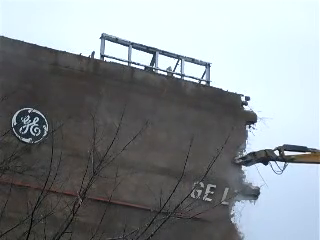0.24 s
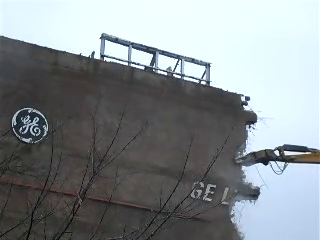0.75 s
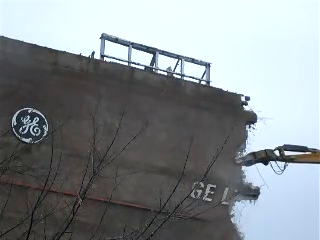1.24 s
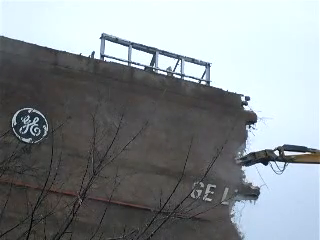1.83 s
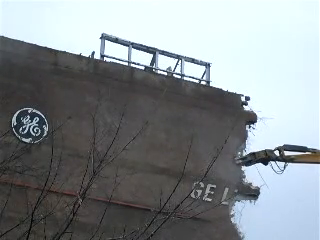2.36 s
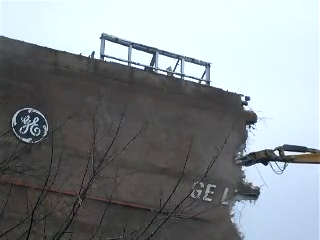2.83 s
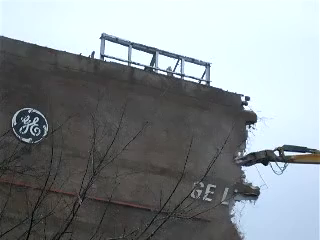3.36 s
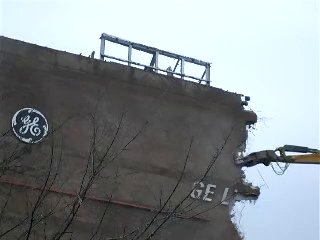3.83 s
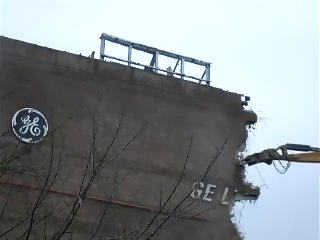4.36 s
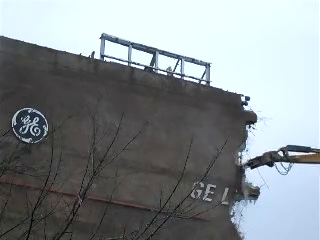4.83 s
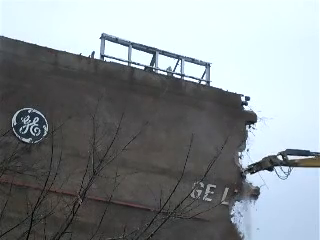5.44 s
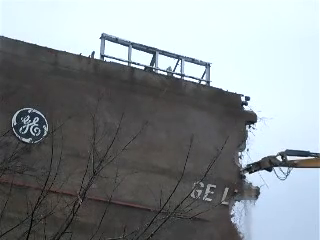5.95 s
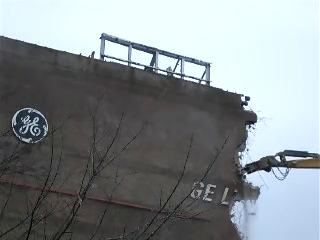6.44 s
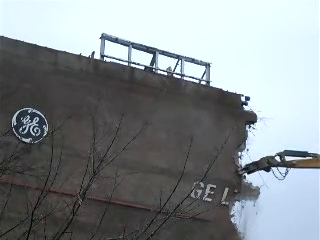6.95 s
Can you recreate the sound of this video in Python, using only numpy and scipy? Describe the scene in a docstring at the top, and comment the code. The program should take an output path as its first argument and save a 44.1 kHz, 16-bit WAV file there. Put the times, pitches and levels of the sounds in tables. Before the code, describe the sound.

Outdoors, a demolition excavator drones steadily, its fan and hydraulics roaring as it bites into a concrete wall. Chips shatter in short, sharp bursts over trickling grit, and a few heavy lumps thud down. About halfway through, a louder thud lands and the roar sinks, leaving the engine rumble. Near the end gravel slides, and chips and lumps fall thickly with a slight, hollow echo.

```python
"""A high-reach excavator bites into a concrete wall outdoors. From the start its diesel drones, fan and
hydraulics roar, hums and rushes swell in the din, and grit trickles. Chips shatter in short splashes, each
doubled by the hard ground. At 1.6 s the first heavy lump thuds down. Near 3 s the concrete gives, the
jaws ease off and the roar sinks. Around 6 s gravel slides, and chips and lumps fall thickly to the end."""
import sys
import numpy as np
from scipy import signal
from scipy.fft import rfft, irfft
from scipy.io import wavfile
from scipy.ndimage import uniform_filter1d

SR = 44100
rng = np.random.default_rng(int(sys.argv[2]) if len(sys.argv) > 2 else 0)


def generate_wav(sig):
    """Save sig (samples, or channels by samples) to the path in sys.argv[1] as 16-bit PCM at SR."""
    pcm = np.round(np.clip(np.atleast_2d(sig).T, -1, 1) * 32767).astype(np.int16)
    wavfile.write(sys.argv[1], SR, pcm)


N = 317520
TIME = np.arange(N) / SR

# Chips that shatter. Each row: start in seconds, base level in dB, heft in dB (more heft means
# louder big fragments), base time the splinters take to scatter in seconds.
CHIPS = [(0.05, -18.5, -6.5, 0.0064), (.206, -17.5, -4, .004), (0.291, -18.5, -12.5, 0.0059),
         (.409, -27, 2, .008), (.602, -25.5, -0.5, .003), (0.699, -18, -2.5, 0.0027),
         (.742, -19, -12, 0.002), (.973, -24, 1.5, .005), (1.131, -14.5, -4.5, 0.0031),
         (1.409, -22, 4, 0.0036), (1.432, -16, -2, 0.0033), (1.548, -21.5, -3.5, 0.0043),
         (1.62, -23, 2.5, 0.0055), (1.713, -23, 3, 0.006), (1.872, -21.5, 0.5, 0.0054),
         (1.944, -25.5, 2, .005), (2.525, -20.5, -10.5, 0.0034), (2.825, -27.5, -4, 0.0063),
         (2.979, -26, -1.5, .009), (3.131, -24.5, 4, 0.0032), (3.138, -13, -4.5, .001),
         (3.679, -25, -11, .0025), (3.828, -20, -4, .0045), (3.894, -19.5, 2, 0.0045),
         (4.093, -17, -2, 0.0057), (4.519, -19.5, 2, .0035), (4.575, -17, -1.5, .004),
         (4.624, -24.5, 1, 0.0042), (5.003, -18.5, -9.5, 0.004), (5.097, -18.5, 0, 0.0053),
         (5.29, -28.5, 5, 0.005), (5.318, -25.5, 1.5, 0.0087), (5.434, -24, 3, 0.0051),
         (5.489, -17, -5, .005), (5.51, -21.5, -3, 0.0042), (5.533, -14.5, -27.5, 0.0018),
         (5.727, -16, -4, 0.0032), (5.884, -20, -7.5, 0.0044), (6.023, -20.5, -2, 0.0062),
         (6.048, -24, -6, .004), (6.073, -26.5, 2, 0.0073), (6.097, -23.5, -1, .009),
         (6.132, -20.5, -1, .003), (6.242, -23.5, 1, 0.0027), (6.288, -22, -6, .003),
         (6.536, -17.5, -7.5, 0.0043), (6.614, -19.5, 2, .004), (6.719, -17.5, -4.5, .006),
         (6.765, -22, 5, .005), (6.888, -18.5, -5, .004), (6.92, -22.5, -8.5, 0.0071),
         (6.963, -22.5, 0.5, 0.0019), (6.99, -16.5, -13, 0.00086), (7.035, -24.5, 3, 0.0033),
         (7.106, -24, -1, 0.0054), (7.143, -20, -10, 0.0034)]
# The hollow tone of knocking stones. Each row: frequency in Hz, relative level in dB.
KNOCK_COLOUR = [(120, -33), (300, 3), (420, -2.5), (530, 7.5), (680, 3), (850, 0), (1050, -1),
                (1600, -23.5)]


def undb(db):
    """Turn decibels into a number to multiply a sound by."""
    return 10 ** (np.asarray(db) / 20)


def unit(x):
    """Scale a signal so that its average size (rms) is 1."""
    return x / np.sqrt(np.mean(x ** 2))


def curve(table):
    """Join rows of (seconds, value) with straight lines, one value per sample."""
    return np.interp(TIME, *np.transpose(table))


def walk(rate):
    """Smooth random wandering of size about 1, with rate new turns a second."""
    steps = np.interp(TIME * rate, np.arange(2048), rng.standard_normal(2048))
    return unit(uniform_filter1d(steps, int(SR / rate / 2)))


def swell(peak_s, length_s):
    """A smooth rise and fall, loudest at peak_s."""
    return np.cos(np.pi * np.clip((TIME - peak_s) / length_s, -.5, .5))


def colour(x, points):
    """Shape the tone along (Hz, dB) points; white noise keeps its power."""
    hz, db = np.transpose(points)
    octave = np.log2(np.maximum(np.arange(N // 2 + 1) * SR / N, 1))
    octaves_outside = np.maximum(np.log2(hz[0]) - octave, 0) + np.maximum(octave - np.log2(hz[-1]), 0)
    gain = undb(np.interp(octave, np.log2(hz), db) - 20 * octaves_outside)
    # These steps make the filter ring after each hit, not before it.
    cepstrum = irfft(np.log(unit(gain)), N)
    cepstrum[1:N // 2] *= 2
    cepstrum[N // 2 + 1:] = 0
    return irfft(rfft(x) * np.exp(rfft(cepstrum)), N)


def resonate(x, hz, width_hz):
    """Let a sound ring at one pitch; a smaller width rings longer."""
    return signal.lfilter(*signal.iirpeak(hz, hz / width_hz, fs=SR), x)


def narrow_noise(hz, width_hz):
    """Noise gathered around one pitch, which may move."""
    lowpass = signal.butter(2, width_hz / 2, fs=SR, output="sos")
    swirl = signal.sosfilt(lowpass, rng.standard_normal((2, N)))
    phase = 2 * np.pi * np.cumsum(hz * np.ones(N)) / SR
    return unit(swirl[0] * np.cos(phase) + swirl[1] * np.sin(phase))


def splinters(rate, scatter_db):
    """Tiny hits of uneven size at random moments, about rate of them a second."""
    hit = rng.random(N) < rate / SR
    size = undb(scatter_db * np.clip(rng.standard_normal(N), -2, 2))
    return unit(hit * size * rng.choice([-1, 1], N))


def splash(starts, db, spread_s):
    """The loudness of bursts of splinters: each grows for spread_s, then dies away."""
    power = np.zeros(N)
    for start, gain, spread in zip(starts, undb(db), spread_s):
        first = max(int(start * SR), 0)
        age = np.arange(min(SR // 5, N - first)) / SR / max(spread, .001)
        power[first:first + len(age)] += gain ** 2 * age * np.exp(1 - age)
    return np.sqrt(power)


def engine():
    """The diesel holds its speed: its firing tones waver on their way through the air, over a rumble."""
    # Firing tones. Each row: pitch in Hz, level in dB, amount of wavering in dB.
    firing_tones = [(39.7, -40.5, 1.9), (79.9, -43.5, -2), (95.9, -51, 1.5), (337.3, -44, 3)]
    # The engine bay's rumble. Each row: time in seconds, level in dB.
    rumble_levels = [(0, -35), (1.1, -32.5), (1.65, -31.5), (2.1, -32), (4.2, -33), (5.4, -34.5),
                     (7.2, -31)]
    # The rumble's tone. Each row: frequency in Hz, relative level in dB.
    rumble_colour = [(12, -23.5), (25, -2.5), (45, -6.5), (65, 2), (90, 0.5), (125, -2), (200, -1.5),
                     (310, -2.5), (450, -7), (800, -12), (2000, -26.5)]
    clock = np.cumsum(1 + 0.00635 * walk(3.3)) / SR  # runs slightly fast and slow
    tones = 0
    for hz, db, waver_db in firing_tones:
        waver = undb(waver_db * walk(3))
        tone = np.sin(2 * np.pi * (hz * clock + rng.random()))
        tones += undb(db) * unit(waver * tone)
    rumble = colour(rng.standard_normal(N), rumble_colour)
    return tones + rumble * undb(curve(rumble_levels) + 1.3 * walk(12))


def roar():
    """Fan air and hydraulic oil rush harder under load; a broad howl drifts with the effort."""
    # The jaws push, then ease off. Each row: time in seconds, base level of the roar in dB.
    load = [(0.0, -26), (0.18, -27), (0.61, -25), (1.47, -25), (1.66, -26), (2.39, -23.5), (2.97, -24.5),
            (3.18, -29), (3.68, -30), (4.25, -34.5), (4.52, -33.5), (5.06, -35.5), (5.44, -35.5),
            (5.8, -35)]
    # The roar's main resonance. Each row: time in seconds, pitch in Hz.
    howl_pitch = [(0.18, 1030), (0.87, 867.5), (1.06, 988), (1.24, 921.5), (3.3, 951.4)]
    # The tone of rushing air and oil. Each row: frequency in Hz, relative level in dB.
    rush_colour = [(120, -27.5), (280, -6), (500, -5.5), (750, -1.5), (1000, -0.5), (1200, -4),
                   (1480, -3.5), (1900, -7.5), (2600, -15.5), (4500, -25.5), (6500, -44)]
    load_db = curve(load)
    rush = colour(rng.standard_normal(N), rush_colour) * undb(0.76 * walk(16))
    howl = narrow_noise(curve(howl_pitch), width_hz=240)
    strain = undb(0.8 * (load_db - load_db.max()))  # the howl stands out only near full load
    return undb(load_db) * (undb(1.42) * rush + undb(-2.0) * strain * howl)


def hums_and_rushes():
    """Bands of noise swell and fade at set times: low hums and brief higher rushes in the din."""
    # Each row: loudest moment in seconds, length in seconds, pitch in Hz, width in Hz, peak level in dB.
    swells = [(0.196, .7, 1152, 250, -34.5), (1.01, 1.16, 154.2, 30, -32.5), (1.55, .7, 52, 5.4, -38.5),
              (2.33, 0.37, 1497, 210, -28.5), (2.703, 0.32, 632, 126, -27), (3.306, 1.9, 1400, 770, -32.5),
              (4.1, 2.3, 82, 20, -39), (6.9, 1.2, 99.9, 60, -39.5)]
    return sum(undb(db) * swell(peak_s, length_s) * narrow_noise(hz, width_hz)
               for peak_s, length_s, hz, width_hz, db in swells)


def grit():
    """Crumbs patter in many small splashes over a fine hiss of sand."""
    # The flow of falling grit. Each row: time in seconds, base level in dB.
    flow = [(0.0, -26.5), (0.12, -31.5), (0.44, -35), (0.98, -38), (1.48, -34), (2.21, -35.5), (3.41, -38),
            (3.79, -34.5), (4.29, -38.5), (4.87, -37), (5.27, -33.5), (5.88, -33.5), (6.22, -30.5),
            (6.56, -31.5), (6.86, -30.5), (7.2, -29.5)]
    # The grit's tone. Each row: frequency in Hz, relative level in dB.
    grit_colour = [(300, -6), (600, 9.5), (1400, -6), (2100, 1), (3000, 2.5), (4000, 3.5), (5000, 2.5),
                   (5600, -4.5), (6500, -12)]
    when, size = rng.random((320, 2)).T
    patter = unit(splash(when * N / SR, db=8 * size ** 2, spread_s=np.full(len(when), .003)))
    crumbs = patter * splinters(rate=3000, scatter_db=3.5)
    sand = splinters(rate=7300, scatter_db=2.0)
    return undb(curve(flow)) * colour(undb(-2.0) * crumbs + undb(-0.35) * sand, grit_colour)


def ground(x, hardness):
    """The ground and a hard surface nearby send the sound back a moment late, making it hollow."""
    # Each row: delay in seconds, strength of the echo at a hardness of 1.
    bounces = [(.00135, 0.13), (.003735, 0.6)]
    echoes = sum(hardness * share * np.interp(TIME - delay, TIME, x, left=0) for delay, share in bounces)
    return (x + echoes) / np.sqrt(1 + sum((hardness * share) ** 2 for _, share in bounces))


def yard(x, fade_s, tail_db, dull_hz):
    """Buildings around the site add a thin, dull tail that falls 60 dB in fade_s."""
    age = TIME[:SR]
    tail = rng.standard_normal(SR) * undb(-60 * age / fade_s) * (1 - np.exp(-age / .02))
    tail = signal.sosfilt(signal.butter(1, dull_hz, fs=SR, output="sos"), tail)
    return x + undb(tail_db) * signal.fftconvolve(x, tail / np.linalg.norm(tail))[:N]


def cracks():
    """The first splinters of each chip: a spray of tiny hits makes the pieces ring."""
    # How splinters ring; light chips ring higher. Each row: pitch in Hz, width in Hz,
    # relative level in dB, extra dB for each dB of heft.
    rings = [(2060, 450, -5.5, 1.1), (3700, 300, -8.5, 0.5), (4420, 820, -11, 0.2)]
    # The crack's bright tone. Each row: frequency in Hz, relative level in dB.
    crack_colour = [(1300, -25), (2200, -2.5), (2800, 0), (3750, -1), (4300, -2.5), (5000, -2), (5600, -9),
                    (6500, -14.5)]
    starts, db, heft_db, spread_s = np.transpose(CHIPS)
    quick_s = .84 * spread_s
    hits = splinters(rate=6500, scatter_db=4.0)
    ring = sum(resonate(splash(starts, db + ring_db + per_heft * heft_db, quick_s) * hits, hz, width_hz)
               for hz, width_hz, ring_db, per_heft in rings)
    spray = splash(starts, db, quick_s) * hits
    return colour(undb(-3.5) * spray + ring, crack_colour)


def chips():
    """Each chip bursts: splinters crack, then bigger fragments clatter and knock, more so with heft."""
    # The tone of clattering fragments. Each row: frequency in Hz, relative level in dB.
    clatter_colour = [(700, -27), (1080, -4), (1220, -9), (1400, 0.5), (1600, -5), (1850, -7.5),
                      (2150, -7.5), (3000, -22)]
    starts, db, heft_db, spread_s = np.transpose(CHIPS)
    clatter_bursts = splash(starts, db + heft_db, 1.38 * spread_s)
    knock_bursts = splash(starts, db + 1.6 * heft_db, 1.8 * spread_s)  # knocks grow faster with heft
    clatter = colour(clatter_bursts * splinters(rate=3700, scatter_db=8.5), clatter_colour)
    knock = colour(knock_bursts * splinters(rate=1800, scatter_db=3.5), KNOCK_COLOUR)
    return cracks() + undb(-4.0) * clatter + undb(-6) * knock


def lumps():
    """A heavy lump lands with one dull, ringing blow and rattles as it tumbles to rest."""
    # Each row: start in seconds, base level in dB, pitch in Hz, tumbling time in seconds.
    landings = [(1.624, -23, 286, .012), (1.714, -21.5, 239, 0.023), (3.131, -16, 297, 0.011),
                (4.579, -31, 293.5, .03), (5.44, -24, 511, .02), (6.076, -22, 276.6, 0.019),
                (6.432, -26.5, 794, 0.017), (6.774, -26.5, 237, 0.023), (6.963, -19.5, 377.4, 0.063),
                (7.037, -29, 788, 0.037), (7.147, -19.5, 396, .024)]
    # How a lump rings. Each row: multiple of its pitch, relative level in dB, seconds to fall 60 dB.
    rings = [(.62, -10.5, .07), (.9, -2, 0.11), (1.04, -0.5, 0.23), (1.42, -0.5, 0.059), (2.2, -11.5, .05)]
    out = np.zeros(N + SR)
    age = np.arange(SR // 4) / SR
    for start, db, hz, tumble_s in landings:
        ring = sum(undb(ring_db - 60 * age / fade_s) * np.sin(2 * np.pi * hz * ratio * age)
                   for ratio, ring_db, fade_s in rings)
        blow = ring * (1 - np.exp(-age / 0.0042))
        rattle = rng.standard_normal(len(age)) * np.exp(-age / tumble_s)
        for _ in range(2):  # filtering twice makes it duller
            rattle = resonate(rattle, 1.06 * hz, width_hz=0.89 * hz)
        thud = unit(blow) + undb(-1.5) * unit(rattle)
        first = int(start * SR)
        out[first:first + len(age)] += undb(db) * unit(thud) * np.sqrt(tumble_s / age[-1])
    return out[:N]


def slide():
    """Coarse gravel pours off the broken edge: a dense, uneven run of small knocks."""
    # One row: loudest moment in seconds, length in seconds, level in dB.
    pour = (6.22, 0.65, -33)
    peak_s, length_s, db = pour
    stones = splinters(rate=1600, scatter_db=3.0) * undb(1.7 * walk(25))
    return undb(db) * colour(swell(peak_s, length_s) * stones, KNOCK_COLOUR)


def scene():
    """Rubble and the machine behind it; the widely scattered grit echoes less than the chips."""
    rubble = ground(chips(), hardness=0.87) + ground(grit() + slide(), hardness=0.13) + lumps()
    rubble = yard(rubble, fade_s=0.48, tail_db=-21.0, dull_hz=2500)
    return (rubble + engine() + roar() + hums_and_rushes())[None]


def record(dry):
    """Cut the highest treble away steeply."""
    top_hz = 6250
    return signal.sosfilt(signal.butter(22, top_hz, fs=SR, output="sos"), dry)


dry = scene()
out = record(dry)
generate_wav(out)
```